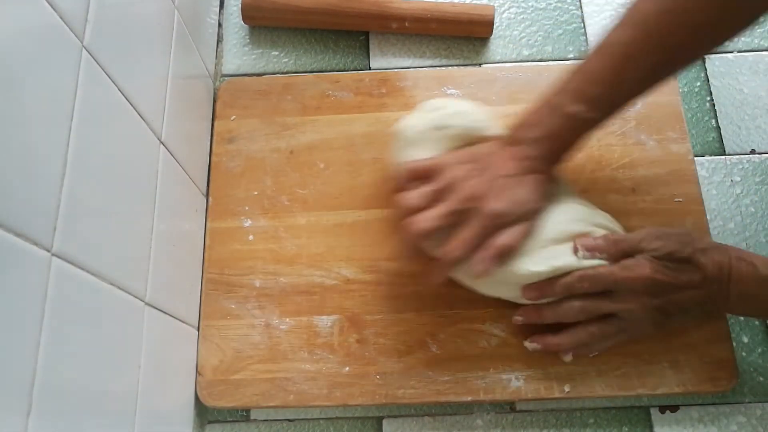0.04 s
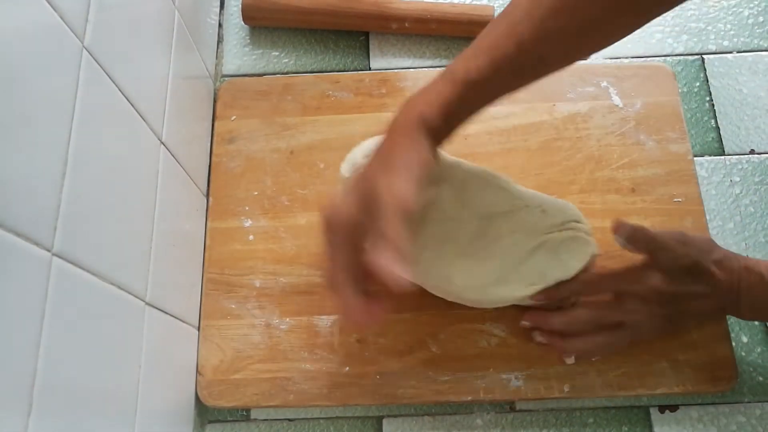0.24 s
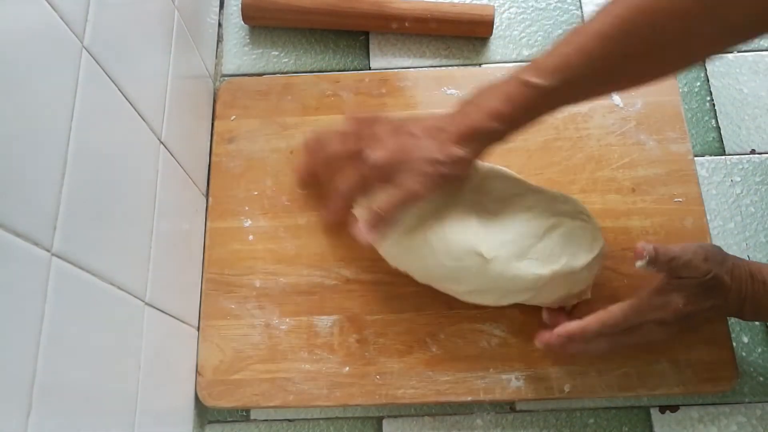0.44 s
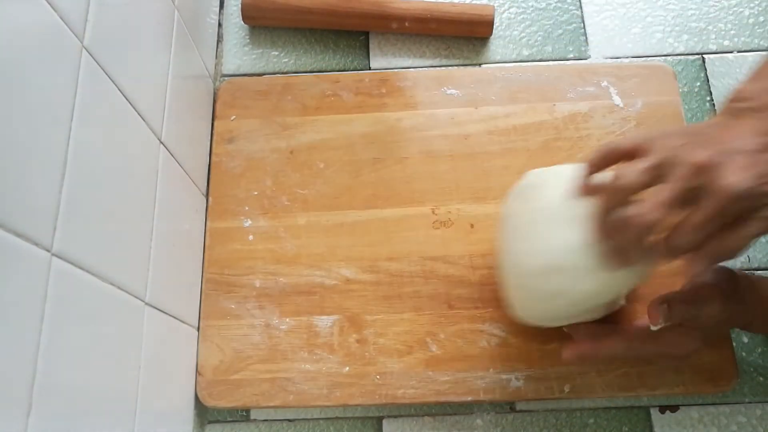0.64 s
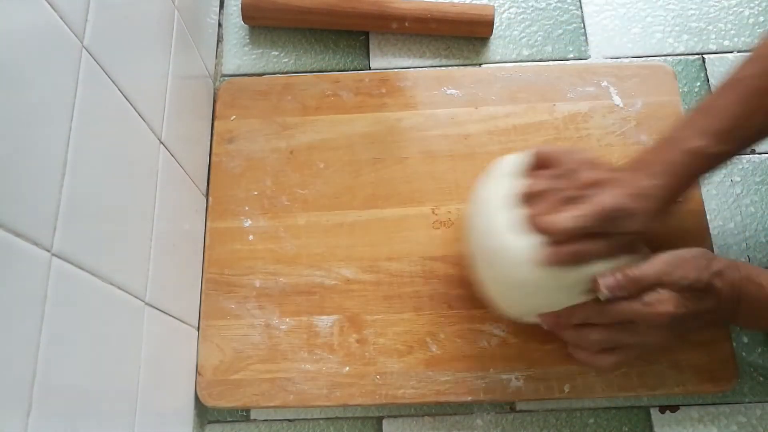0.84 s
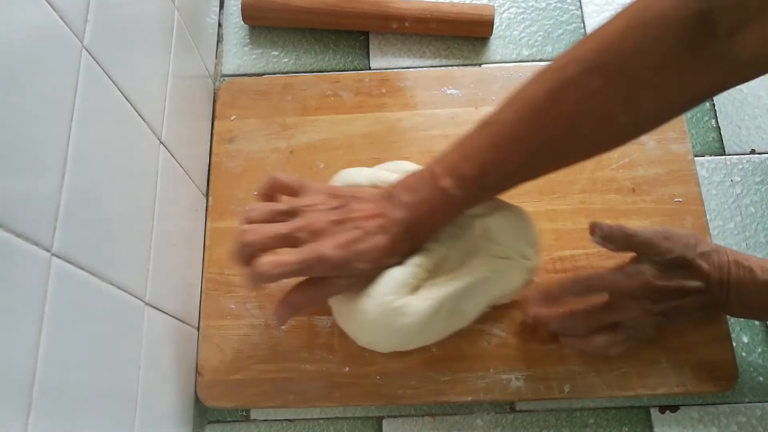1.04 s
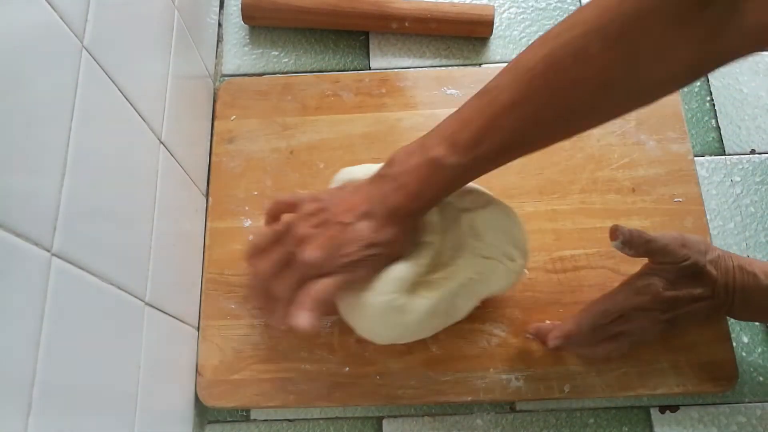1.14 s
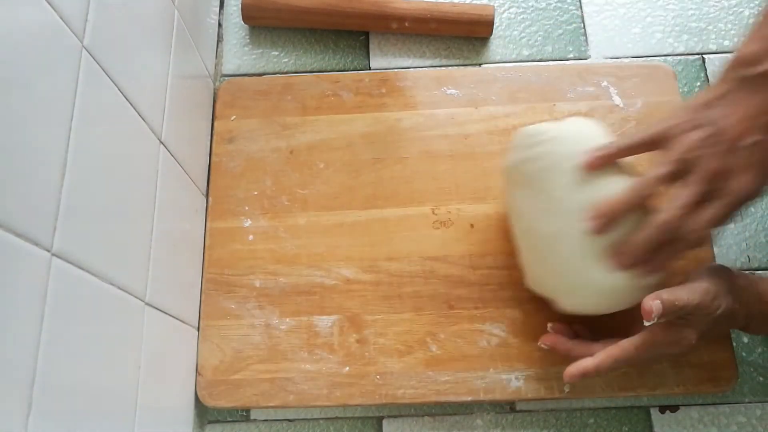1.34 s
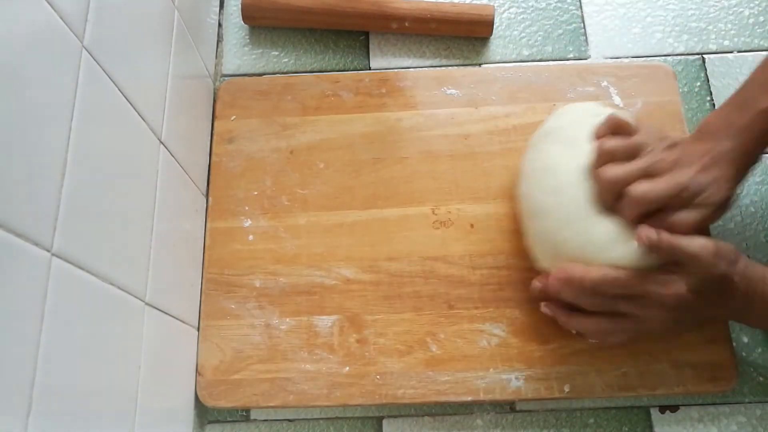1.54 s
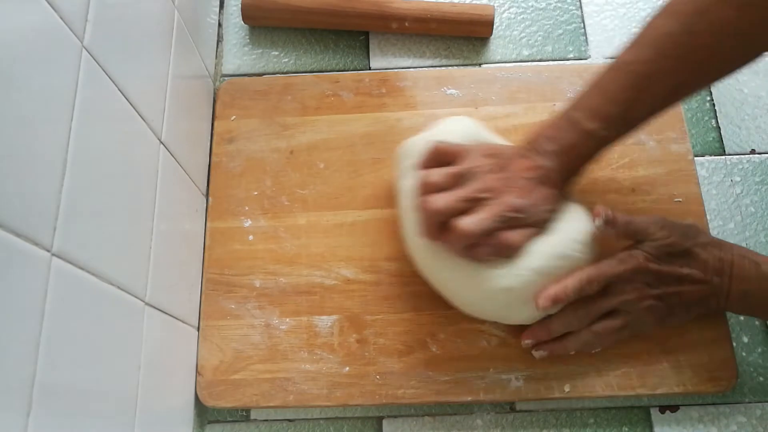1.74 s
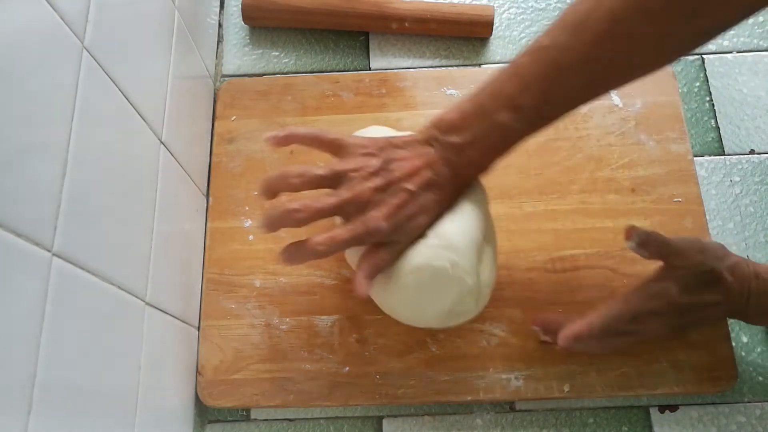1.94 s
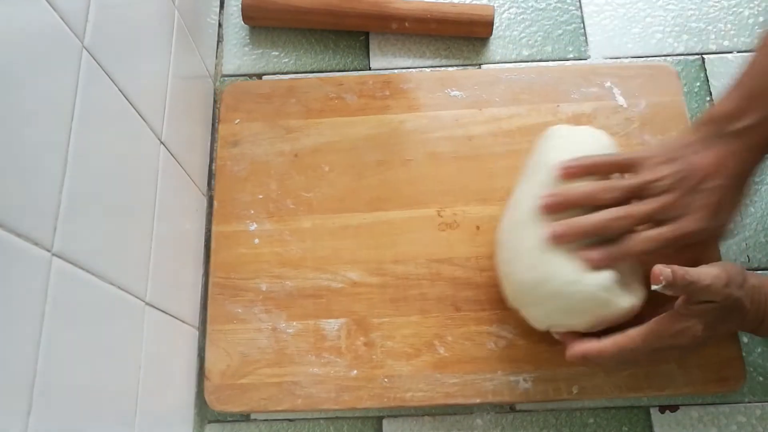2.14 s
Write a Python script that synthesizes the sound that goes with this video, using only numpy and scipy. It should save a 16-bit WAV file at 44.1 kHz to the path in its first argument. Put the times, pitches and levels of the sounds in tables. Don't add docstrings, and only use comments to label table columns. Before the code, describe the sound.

Dough kneaded on a wooden board that knocks against tiles. Faint floury sliding and low rumble begin; at 0.2 s a rapid hollow clatter with a brief scrape, at 0.37 s the loudest sharp clack, at 0.45 s a softer knock and rub. Near-quiet with hum, then a double knock at 1.17 s and a light tap at 1.23. Soft sliding around 1.8 s, and faint dragging rises toward 2.2 s.

```python
import sys
import numpy as np
from scipy import signal
from scipy.io import wavfile

SR = 44100
rng = np.random.default_rng(int(sys.argv[2]) if len(sys.argv) > 2 else 0)


def persist_wave(psi):
    counts = np.round(np.clip(psi, -1, 1) * 32767).astype(np.int16)
    wavfile.write(sys.argv[1], SR, np.atleast_2d(counts).T)


def level_to_linear(level):
    exponent = np.asarray(level, float) / 20
    return 10 ** exponent


N = 97020


def rms_one(x):
    return x / np.sqrt(np.mean(x ** 2) + 1e-20)


def in_time(rows):
    s, *columns = np.transpose(rows)
    return [np.interp(np.arange(N) / SR, s, c) for c in columns]


def at_hz(points, hz):
    table_hz, value = np.transpose(points)
    return np.interp(np.log(hz), np.log(table_hz), value)


def drift(rate_hz):
    r = np.exp(-80 * np.pi * rate_hz / SR)
    white = rng.standard_normal(N // 40 + 2002)
    slow = signal.lfilter([1], [1, -2 * r, r * r], white)[2000:]
    return np.interp(np.arange(N) / 40, np.arange(len(slow)), rms_one(slow))


def band(x, low_hz, high_hz, order=2):
    return signal.sosfilt(signal.butter(order, [low_hz, high_hz], "band", fs=SR, output="sos"), x)


def highpass(x, hz, order):
    return signal.sosfilt(signal.butter(order, hz, "high", fs=SR, output="sos"), x)


def ring(x, hz, t60):
    r, w = level_to_linear(-60 / (t60 * SR)), 2 * np.pi * hz / SR
    return signal.lfilter([0, np.sin(w)], [1, -2 * r * np.cos(w), r * r], x + 1e-18)


def bank(white, low_hz, gain, count=2):
    edges = low_hz * 2 ** np.arange(0, np.log2(18000 / low_hz), 1 / count)
    total = 0
    for k, (low, high) in enumerate(zip(edges, edges[1:])):
        first, second = band(white[k % 2], low, high)
        total = total + gain(np.sqrt(low * high), first, second)
    return total


def pair(mid, side, alike):
    alike = np.clip(alike, -.99, .995)
    return np.sqrt(1 + alike) * mid + np.sqrt(1 - alike) * side * [[1], [-1]]


def resonant(x, peaks):
    return rms_one(sum(level_to_linear(db) * rms_one(ring(x, hz, 2.2 / width)) for hz, width, db in peaks))


def bell(hz, q, db):
    g, w = level_to_linear(db / 2), 2 * np.pi * hz / SR
    a, c = np.sin(w) / (2 * q), -2 * np.cos(w)
    return [1 + a * g, c, 1 - a * g], [1 + a / g, c, 1 - a / g]


# [t/s, level/dB, level of the fine dust at the very top/dB]
SLIDE = [(0, -83, -59), (.06, -63, -67), (.23, -67.5, -79), (.31, -66, -82), (.345, -102.5, -99),
         (.43, -88, -74.5), (.5, -59, -61.5), (.56, -76.5, -80), (.65, -82.5, -82), (.69, -90, -92.5),
         (.79, -85, -89), (.84, -90, -86.5), (.9, -86, -75), (1.07, -72, -74), (1.13, -93.5, -95.5),
         (1.19, -75, -78), (1.23, -74.5, -78), (1.27, -91.5, -93), (1.38, -82.5, -89.5),
         (1.43, -87.5, -72.5), (1.51, -91.5, -71.5), (1.57, -97, -96), (1.7, -77, -78.5), (1.82, -66, -70),
         (1.93, -72, -73), (1.99, -91.5, -88.5), (2.1, -84, -85.5), (2.2, -64, -68.5)]
# [f/Hz, level/dB]
FLOUR_COLOUR = [(4000, -16.5), (6000, -16.5), (8000, -20), (9800, -12.5), (11300, -6.5), (13000, -6),
                (15500, -6.5)]
GRAINS_PER_S, GRAIN_SPREAD_DB, DUST_HZ = 36000, 4, 14600


def flour():
    level_db, dust_db = in_time(SLIDE)
    shape = (2, 2, N)
    hits = rng.random(shape) < GRAINS_PER_S / SR
    size_db = GRAIN_SPREAD_DB * np.minimum(rng.exponential(1, shape), 3.0)
    grains = hits * rng.standard_normal(shape) * level_to_linear(size_db)

    def colour(hz, left, right):
        return level_to_linear(at_hz(FLOUR_COLOUR, hz) + 1.5 * drift(20.6)) * np.array([left, right])

    hiss = rms_one(bank(grains, 3000, colour, count=4))
    dust = rms_one(highpass(grains[0, 1], DUST_HZ, 4)) * [[1], [.2]]
    return level_to_linear(level_db + 2.5 + 0.67 * drift(9.3)) * hiss + level_to_linear(dust_db + 3.0 + .8 * drift(12)) * dust


# [t/s, level/dB]
PRESS = [(0, -56), (.15, -63), (.2, -68), (.36, -61), (.45, -52.5), (.57, -63), (.7, -67), (.85, -71.5),
         (1.07, -62.5), (1.16, -72.5), (1.25, -52.5), (1.33, -66.5), (1.5, -66.5), (1.7, -71),
         (1.84, -56.5), (1.93, -66.5), (2.07, -67), (2.2, -58.5)]
# [f/Hz, width/Hz, level/dB]
RUMBLE = [(71, 6.4, -3), (98, 12, -5.5), (156, 49, -11.5), (198, 16, -7), (232.4, 35, -5)]
# [t/s, level/dB]
DRAG = [(0, -61.5), (.07, -68), (.2, -88), (.24, -43.5), (.33, -66.5), (.4, -87), (.5, -51), (.56, -59),
        (.65, -67.5), (.69, -82.5), (.9, -101), (.96, -70.5), (1.05, -90), (2.03, -95.5), (2.07, -69.5),
        (2.14, -66), (2.2, -51.5)]
# [f/Hz, width/Hz, level/dB]
SCRAPE = [(900, 18, -11), (1150, 220, -9), (1596, 480, 5), (2380, 280, -11), (3100, 910, -3.5),
          (3917, 870, -6), (5190, 470, -6.5), (7100, 1800, -10.5)]
ROCK_HZ, ROCK_DB = 98.5, 1


def board_under_load():
    press_db, drag_db = in_time(PRESS)[0], in_time(DRAG)[0]
    rock_hz = ROCK_HZ + 4.4 * drift(5.0)
    rock = level_to_linear(ROCK_DB) * np.sin(2 * np.pi * np.cumsum(rock_hz) / SR)
    rumble = resonant(rng.standard_normal(N), RUMBLE) + rock
    scrape = resonant(rng.standard_normal((2, N)), SCRAPE)
    return level_to_linear(press_db) * rumble + level_to_linear(drag_db - 4.5 + 1.2 * drift(40)) * scrape


# [f/Hz, level/dB]
HUM_COLOUR = [(12, -25), (25, 5), (45, -17), (150, -4), (270, -25.5), (1030, -17.5), (1190, -22.5),
              (1860, -25), (16000, -44.5)]
# [f/Hz, likeness]
LIKENESS = [(60, 1.1), (150, 1), (380, -2.5), (950, -0.071), (2380, 0.16), (5980, 0.076), (15000, -1.1)]
HUM_DB = -68


def hum():
    def colour(hz, mid, side):
        return level_to_linear(at_hz(HUM_COLOUR, hz) + 0.65 * drift(3.3)) * pair(mid, side, at_hz(LIKENESS, hz))

    return level_to_linear(HUM_DB) * rms_one(bank(rng.standard_normal((2, 2, N)), 20, colour))


# [t/s, f/Hz, level/dB, t60/s]
RINGS = [(0.2082, 2868, -46, 0.088), (0.2081, 3300, -42, .03), (0.211, 384, -27, 0.04),
         (.2120, 1725, -36, 0.059), (.2150, 607, -31, 0.058), (.2145, 1037, -24, 0.041),
         (0.257, 1614, -60, 0.46), (0.261, 2865, -52, 0.063), (0.3684, 490, -28, 0.044),
         (.3688, 3220, -27.5, 0.012), (0.369, 3924, -32, .018), (.3780, 3500, -49, .04),
         (.3680, 383.3, -32.5, 0.045), (.3690, 1883, -27.5, 0.056), (.3700, 2422, -24, .022),
         (0.373, 1229, -28, .07), (.3770, 2002, -35, 0.092), (0.3881, 1552, -35.5, 0.099),
         (0.432, 1562, -46, 0.13), (0.447, 1619, -43, 0.15), (.5700, 1569, -67.5, .2),
         (0.9425, 2350, -51, .014), (.9437, 1850, -53, 0.021), (.9437, 1250, -57.5, .02),
         (.9540, 1123, -66, 0.039), (1.1660, 2514, -43.5, 0.039), (1.1680, 394, -31, 0.063),
         (1.1800, 807, -35, 0.18), (1.2280, 810.4, -37.5, 0.19), (1.228, 1166, -43, 0.075),
         (1.3500, 1437, -70, 0.22), (2.0620, 1486, -67, .12), (2.109, 1603, -68, .2),
         (2.1500, 858, -62.5, 0.11), (2.1650, 4000, -66, .2)]
RING_RISE_CYCLES, RING_PAN_DB = 1.4, 2.2
FLUTTER_DB, FLUTTER_HZ = 3.5, 90


def rings():
    s, hz, db, t60 = np.array(RINGS).T[:, :, None]
    since = np.maximum(np.arange(N) / SR - s, 0)
    swell = 1 - np.exp(-since * hz / RING_RISE_CYCLES)
    tones = level_to_linear(db + 1.5 - 60 * since / t60) * swell * np.sin(2 * np.pi * hz * since)
    flutter = np.array([drift(FLUTTER_HZ) for _ in RINGS])
    tones = tones * level_to_linear(FLUTTER_DB * flutter * np.minimum(since / .02, 1))
    pan_db = RING_PAN_DB * rng.uniform(-1, 1, len(RINGS)) * [[1], [-1]]
    return level_to_linear(pan_db) @ tones


# [t/s, peak level/dB, air pop f/Hz, whole-board thud level/dB, crack level/dB]
KNOCKS = [(0.2094, -25, 883, -71, -56), (0.2166, -20.5, 732.3, -71.5, -52.5),
          (0.2138, -20.5, 1058, -66.5, -55.5), (.2225, -23.5, 722, -71, -63), (.2290, -36, 708, -41, -65),
          (0.3527, -43, 694.5, -51, -62), (0.3675, -6, 1021, -28, -35.5), (.3740, -18.5, 963, -62, -56.5),
          (0.3782, -30, 1052, -63, -60.5), (0.391, -29, 1443, -59.5, -66.5),
          (.4450, -28.5, 790, -82.5, -63), (.4490, -21.5, 962, -30.5, -41.5), (0.459, -34, 560, -62, -80),
          (.8170, -67, 1236, -67.5, -85), (.3688, -22, 2170, -81, -33), (0.9843, -63, 2396, -99, -84),
          (1.1645, -18, 900, -61.5, -44), (1.1730, -13, 945, -53, -51), (1.1790, -47.5, 940, -27.5, -71),
          (1.1860, -24.5, 813, -62, -51), (1.2250, -28, 809, -59, -65), (1.2294, -42, 785, -40, -62),
          (1.283, -55, 792, -43.5, -72)]
# [f/Hz, level/dB, t60/s]
THUD_MODES = [(268.2, 3, 0.09), (290.5, -5, .07), (216, -18.5, .1), (399.3, -9.5, 0.21), (483, -17, 0.2)]
# [f/Hz, level/dB, t60/s]
BOARD_MODES = [(800, -28, 0.41), (970, -26.5, 0.077), (1020.5, -21, 0.08), (1167, -25.5, 0.11),
               (1362, -23, 0.12), (1580, -30.5, 0.087), (1650, -37.5, 0.17), (1735, -23.5, .08),
               (2017, -29, 0.12), (2303, -31.5, 0.03)]
POP_CYCLES, POP_RISE_CYCLES = 17, 2.3
POP_DB = np.array([[0.5], [1.5]])
EDGE_RATIO, EDGE_CYCLES, EDGE_DB = 1.482, 6.4, -7
CRACK_HZ, CRACK_T60_S = 2599, 0.011
RATTLE_HZ, RATTLE_DB, RATTLE_T60_S = 1930, -5, 0.27
THUD_PUSH_S = 0.01


def knocks():
    t = np.arange(SR // 4) / SR
    since = np.array([t, t])
    out, thud_push = np.zeros((2, N + SR)), np.zeros(N + SR)
    for s, db, hz, thud_db, crack_db in KNOCKS:
        i, span = int(s * SR), POP_RISE_CYCLES / hz
        edge_hz = EDGE_RATIO * hz
        push = np.sin(np.pi * np.minimum(since / span, 1)) ** 2 * 4 / (span * SR)
        touch = push * np.sin(2 * np.pi * hz * since)
        edge = push * np.sin(2 * np.pi * edge_hz * since)
        pop = level_to_linear(POP_DB) * ring(touch, hz, POP_CYCLES / hz)
        pop = pop + level_to_linear(EDGE_DB) * ring(edge, edge_hz, EDGE_CYCLES / edge_hz)
        wood = 0
        for mode_hz, mode_db, t60 in BOARD_MODES:
            luck = rng.standard_normal((2, 1))
            wood = wood + level_to_linear(mode_db) * luck * ring(touch + edge, mode_hz, t60)
        grit = rng.standard_normal((2, len(t)))
        crack = level_to_linear(-60 * t / CRACK_T60_S) * band(grit, CRACK_HZ / 1.6, CRACK_HZ * 1.6, 3)
        rattle = band(grit, RATTLE_HZ / 1.45, RATTLE_HZ * 1.45, 3)
        crack = crack + level_to_linear(RATTLE_DB - 60 * t / RATTLE_T60_S) * rattle
        out[:, i:i + len(t)] += level_to_linear(db) * (pop + wood) + level_to_linear(crack_db + 5.5) * crack
        thud_push[i] += level_to_linear(thud_db)
    thud = 0
    for hz, db, t60 in THUD_MODES:
        pushed = ring(thud_push, hz, 6.63 * THUD_PUSH_S) / (THUD_PUSH_S * SR / 2)
        thud = thud + level_to_linear(db) * ring(pushed, hz, t60)
    return highpass(out[:, :N], 320, 2), thud[:N]


# [t/s, level/dB, tail level/dB]
TICKS = [
    (0.2105, -50, -63),
    (0.2151, -44.5, -64.5),
    (0.3542, -68.5, -95),
    (0.3681, -64, -106),
    (0.4462, -57.5, -67),
    (1.164, -48, -66.5),
    (1.172, -49, -61),
]
TICK_HZ, TICK_T60_S = 5397, .02
TAIL_DB, TAIL_T60_S = 10, 0.3
CLICK_DB, CLICK_T60_S, CLICK_TOP_HZ = -8.5, 0.011, 10000


def ticks():
    s, db, tail_db = np.array(TICKS).T[:, :, None]
    since = np.arange(N) / SR - s

    def dying(level_db, t60):
        return np.sum((since > 0) * level_to_linear(level_db - 60 * np.abs(since) / t60), axis=0)

    white = rng.standard_normal((2, N))
    burst = band(white, TICK_HZ / 2.5, TICK_HZ * 1.11)
    click = band(white[::-1], 3000, CLICK_TOP_HZ)
    burst_level = dying(db + 8.5, TICK_T60_S) + dying(tail_db + TAIL_DB, TAIL_T60_S)
    return burst_level * burst + dying(db + CLICK_DB, CLICK_T60_S) * click


# [f/Hz, t60/s]
ROOM_T60 = [(150, 0.99), (500, 0.21), (1000, 0.22), (2000, 0.29), (4000, 0.36), (9000, 0.23)]
ROOM_DB, ROOM_RISE_S, ROOM_ALIKE = -14, 0.0043, 0.16


def kitchen(x):
    t = np.arange(SR // 2) / SR

    def decay(hz, mid, side):
        return level_to_linear(-60 * t / at_hz(ROOM_T60, hz)) * pair(mid, side, ROOM_ALIKE)

    tail = bank(rng.standard_normal((2, 2, len(t))), 120, decay) * (1 - np.exp(-t / ROOM_RISE_S))
    tail = tail / np.sqrt(np.sum(tail ** 2) / 2)
    return level_to_linear(ROOM_DB) * signal.fftconvolve(x, tail, axes=1)[:, :N]


def shaded(x):
    up, down = bell(730, 1.9, -13)
    return np.array([np.roll(signal.lfilter(up, down, x[0]), 4), x[1]])


def scene():
    steady = flour() + board_under_load() + hum()
    ringing = rings()
    hits, thud = knocks()
    hits = hits + ringing
    return steady + shaded(hits + thud) + ticks() + kitchen(hits)


def top_cut(x):
    return signal.sosfilt(signal.butter(12, 17020, fs=SR, output="sos"), x)


# [f/Hz, Q, level/dB]
PORTS = [(700, 1.3, -4), (1350, 2, 6), (2400, 1.5, -4), (4500, 1.2, -2), (10500, 2.1, -19), (14500, 2, 4)]
CUTOFF_HZ = 15800


def record(dry):
    left, right = dry
    for hz, q, db in PORTS:
        up, down = bell(hz, q, db / 2)
        left, right = signal.lfilter(up, down, left), signal.lfilter(down, up, right)
    cut = signal.ellip(14, .3, 70, CUTOFF_HZ, fs=SR, output="sos")
    return top_cut(signal.sosfilt(cut, [left, right]))


dry = scene()
out = record(dry)
persist_wave(out)
```